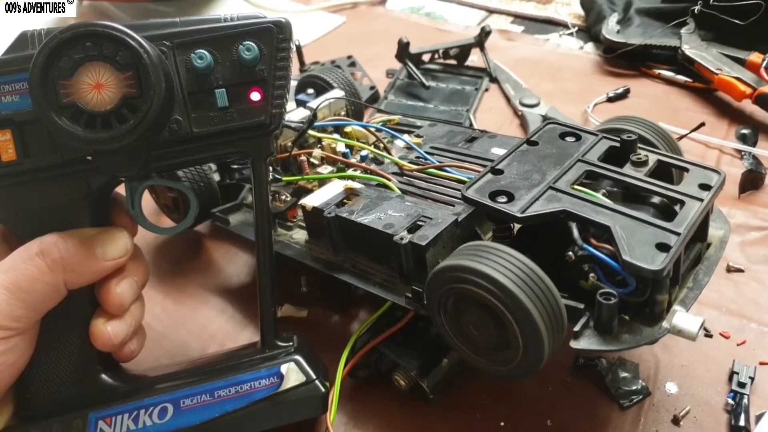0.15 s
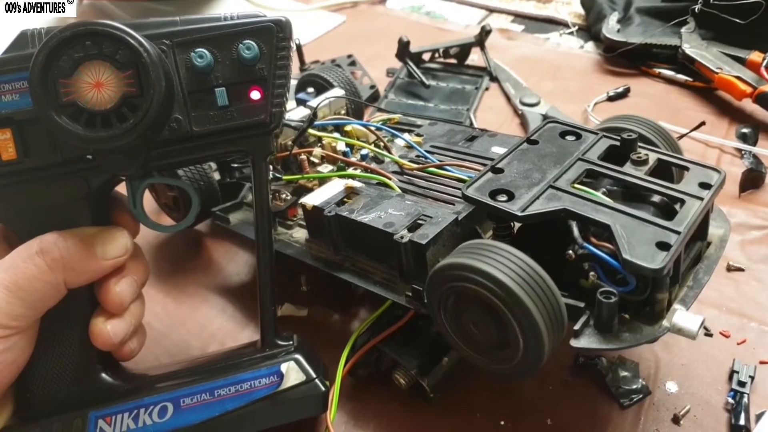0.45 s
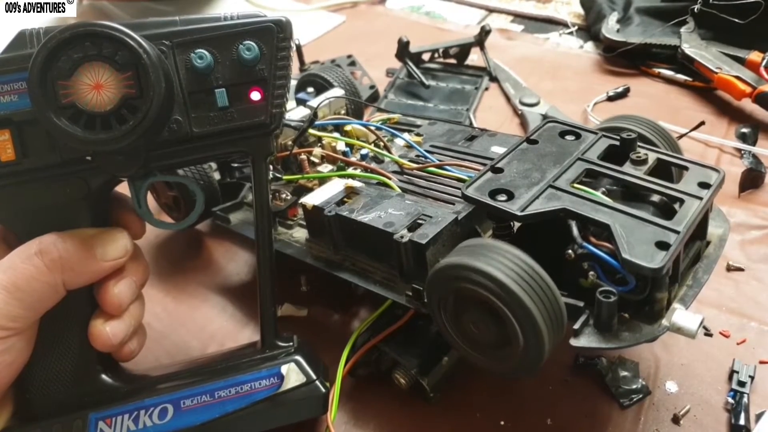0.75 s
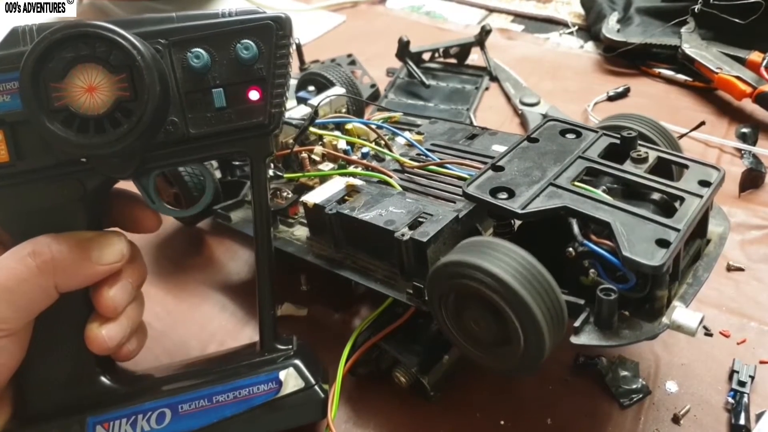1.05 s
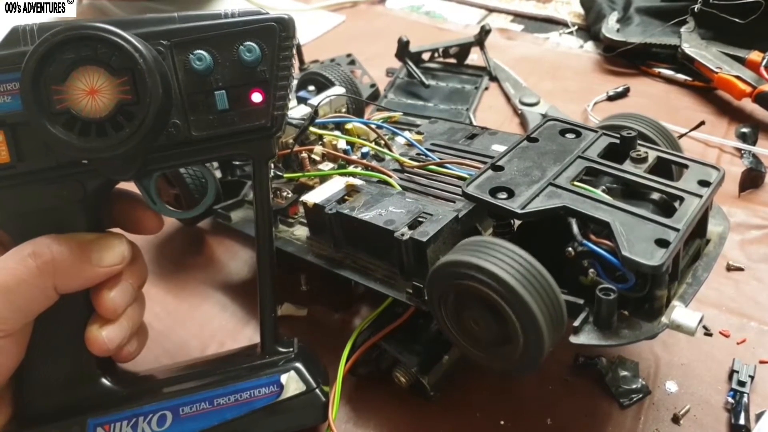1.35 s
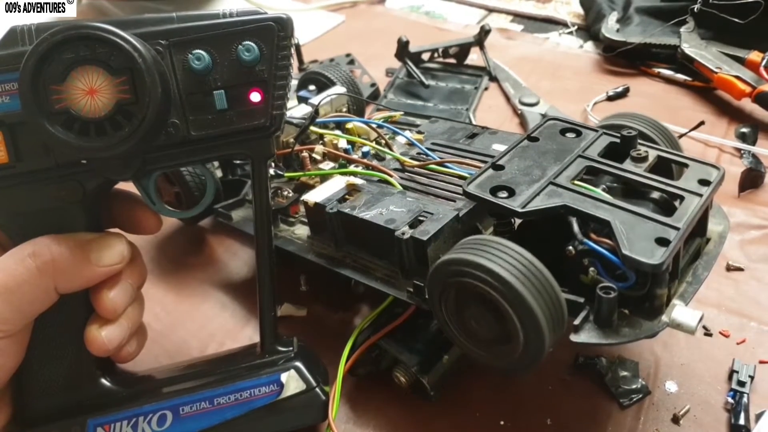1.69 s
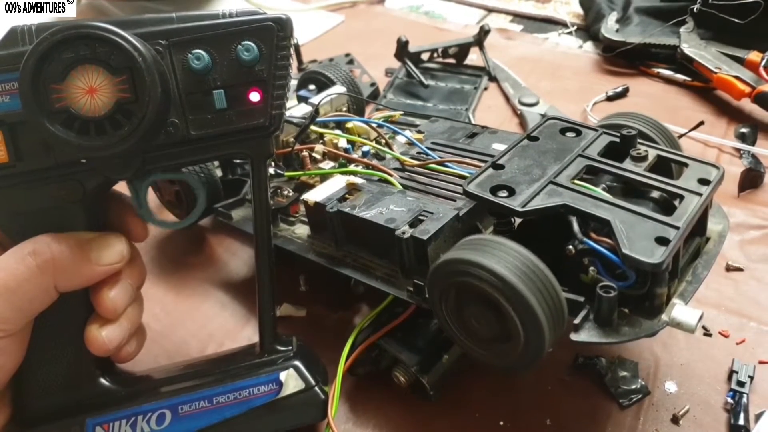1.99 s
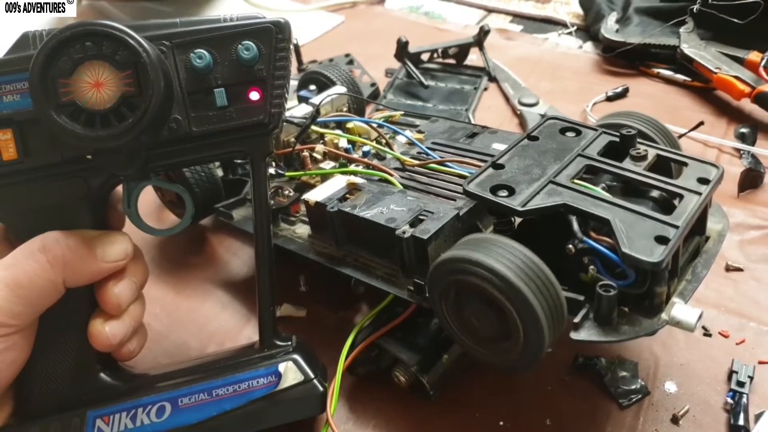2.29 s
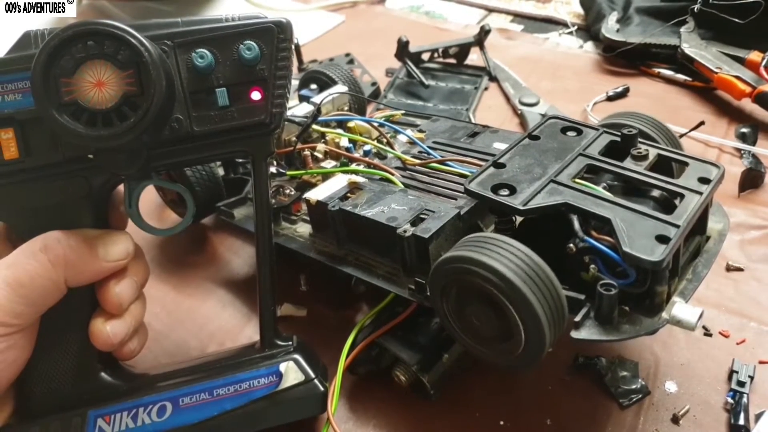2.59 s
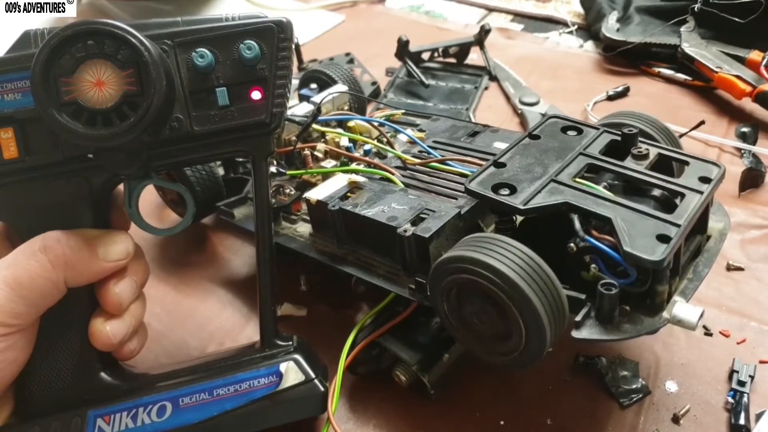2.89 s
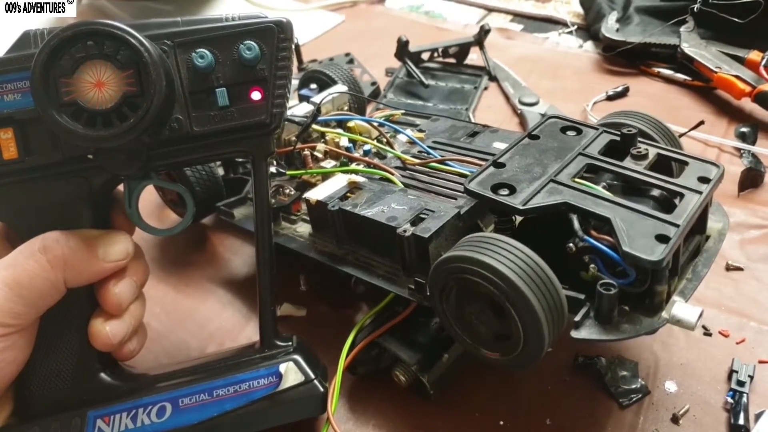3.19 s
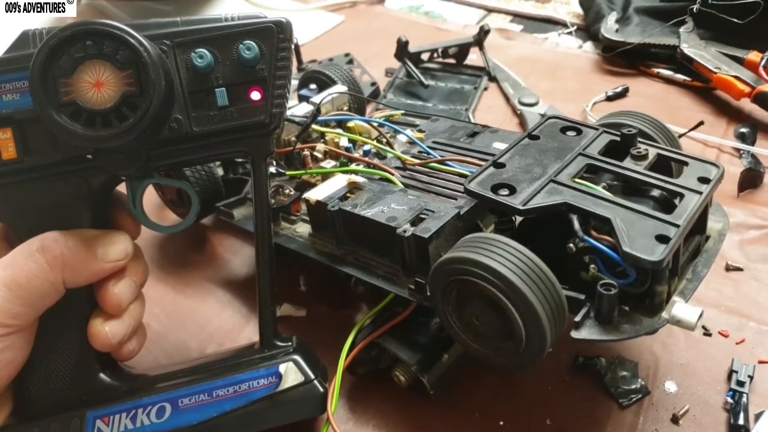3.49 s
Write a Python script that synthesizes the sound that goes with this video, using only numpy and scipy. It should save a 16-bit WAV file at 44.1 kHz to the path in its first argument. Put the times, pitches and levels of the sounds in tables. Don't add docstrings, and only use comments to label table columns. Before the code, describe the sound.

Close up on a workbench, a toy car's motor and gearbox whir, with bright gritty rattle, brush hiss and a thin whine; speed climbs, holds, dies away, then kicks back in with quick knocks.

```python
import sys
import numpy as np
from scipy import signal
from scipy.fft import rfft, irfft, next_fast_len
from scipy.io import wavfile
from scipy.ndimage import uniform_filter1d, map_coordinates

SR = 44100
rng = np.random.default_rng(int(sys.argv[2]) if len(sys.argv) > 2 else 0)


def dump_mix(stems):
    frames = np.atleast_2d(stems).T
    limited = np.clip(frames, -1, 1)
    pcm = np.round(limited * 32767).astype(np.int16)
    wavfile.write(sys.argv[1], SR, pcm)


def field_ratio(decibels):
    return 10 ** (np.asarray(decibels, dtype=float) / 20)


N = 160965
FULL_HZ = 385

# time in seconds, speed in turns per second (Hz).
SHAFT = [(0, 256), (.3, 270), (.6, 303), (.8, 350), (.95, 371), (1.05, 378), (1.4, 385), (2.15, 391),
         (2.21, 381), (2.35, 316), (2.6, 240), (3.0, 130), (3.45, 20), (3.5, 45), (3.65, 150)]
# time in seconds, rattle level in dB.
EFFORT = [(0.0, -17.5), (0.17, -17), (0.29, -18), (0.92, -16.5), (2.1, -18), (2.22, -16), (2.51, -20.5),
          (2.89, -25), (2.93, -28.5), (2.955, -26), (3.0, -32.5), (3.03, -28.5), (3.29, -35.5),
          (3.42, -40.5), (3.47, -45.5), (3.5, -40), (3.56, -27.5), (3.65, -22)]
# frequency in Hz, level in dB.
BODY = [(120, -78), (300, -28.5), (580, -33), (1000, -15), (2000, -5), (3300, -1), (6200, -10), (8500, -25)]
# frequency in Hz, level in dB.
BRUSH = [(5000, -37.5), (7500, -13), (9000, -13), (12500, -11.5), (15000, -13), (15600, -11)]


def unit(x):
    return x / np.sqrt(np.mean(x ** 2) + 1e-20)


def along(points, hz):
    f, value = np.transpose(points)
    return np.interp(np.log(hz + 1), np.log(f + 1), value)


def curve(rows):
    return np.interp(np.arange(N) / SR, *np.transpose(rows))


def wobble(rate):
    knots = rng.standard_normal(int(N * rate / SR) + 4)
    return map_coordinates(knots, [np.arange(N) * rate / SR])


def filtered(x, response):
    m = next_fast_len(N + SR // 2)
    return irfft(rfft(x, m) * response(np.fft.rfftfreq(m, 1 / SR)), m)[..., :N]


def rings(f):
    # frequency in Hz, width in Hz, strength in dB.
    resonances = [(461, 15, 10), (863, 150, 6), (1054.5, 14, 14.5), (1183, 26, 8), (1315, 30, 8.5),
                  (1892, 13.8, 10.5), (2220, 85, 2), (2414, 19, 6), (3310, 15, 4.5), (3483, 25, 4),
                  (6770, 77, 9), (4470, 162, 7), (5416, 450, 4.5), (7380, 150, 7.5)]
    power = 1
    for centre, width, db in resonances:
        peak = (f * width) ** 2 / ((centre ** 2 - f * f) ** 2 + (f * width) ** 2)
        power = power + field_ratio(2 * (0.8 + db)) * peak
    return np.sqrt(power)


def chassis(f):
    return field_ratio(along(BODY, f)) * rings(f)


def patchy(x):
    z = signal.stft(x, nperseg=256)[2]
    field = rng.standard_normal(z.shape[1:])
    field = uniform_filter1d(field, size=3, axis=0)
    field = uniform_filter1d(field, size=16, axis=1)
    patch_db = 1.47 * unit(field)
    return signal.istft(z * field_ratio(patch_db), nperseg=256)[1][:, :N]


def knocks(shaft_hz, parts):
    idle_knocks_hz, knocks_per_turn = 83.6, 2.2
    t60_s, rise_s = 0.0097, 0.002
    chance = (idle_knocks_hz + knocks_per_turn * shaft_hz) / SR
    strength_db = 5 * np.clip(rng.standard_normal((parts, N)), -2, 2)
    hits = (rng.random((parts, N)) < chance) * field_ratio(strength_db)
    hit_power = hits ** 2 + .5 * np.roll(hits, 1, 0) ** 2

    t = np.arange(SR // 20) / SR
    decay = field_ratio(-120 * t / t60_s) * (1 - np.exp(-t / rise_s))
    power = np.abs(signal.fftconvolve(hit_power, decay[None], axes=1)[:, :N])
    power = power / uniform_filter1d(power.mean(0) + 1e-9, size=SR // 4)
    slide_db = -7.5 + 3.5 * np.log2(shaft_hz / FULL_HZ)
    power = power + field_ratio(2 * slide_db)

    wheel_hz = 0.083 * shaft_hz
    wheel = np.sin(2 * np.pi * np.cumsum(wheel_hz) / SR + wobble(5.37))
    swell = field_ratio(1.29 * wheel + 0.2 * (wobble(45) + wobble(45.11)))
    ticks_hz, tick_db = 75.7, 17.5
    ticks = field_ratio(tick_db) * (rng.random((parts, N)) < ticks_hz / SR) * rng.standard_normal((parts, N))
    rattle = np.sqrt(power) * swell * rng.standard_normal((parts, N))
    return unit(patchy(rattle + ticks))


def gears():
    effort_db = curve(EFFORT)
    drive = knocks(curve(SHAFT), parts=3)
    top_db = effort_db.max()
    below_db = effort_db - top_db
    can_hz, can_width_hz = 3930, 440

    def can(f):
        return (1j * f * can_width_hz / (can_hz ** 2 - f * f + 1j * f * can_width_hz)) ** 2

    def brush(f):
        return field_ratio(along(BRUSH, f))

    def sounding(level_db, response):
        full = np.sqrt(np.mean(filtered(drive, response) ** 2))
        return filtered(drive * field_ratio(level_db), response) / full

    ring_db = top_db - 14 + .62 * below_db + 2.5 * wobble(6.15)
    hiss_db = top_db - 11.5 + 1.91 * below_db
    return sounding(effort_db, chassis) + sounding(ring_db, can) + sounding(hiss_db, brush)


def bench(x):
    # frequency in Hz, time to fall by 60 dB in seconds.
    fade_times = [(300, 0.14), (3000, 0.063), (12000, 0.068)]
    far_lags = np.array([4, 17, 31])
    hz, t, z = signal.stft(rng.standard_normal((len(x), 2, SR // 5)), SR, nperseg=128)
    fade = field_ratio(-60 * t / along(fade_times, hz)[:, None])
    tail = signal.istft(z * fade, SR, nperseg=128)[1]
    path = field_ratio(6.5) * tail / np.linalg.norm(tail, axis=-1, keepdims=True)
    path[:, 0, 0] += 1
    path[np.arange(len(x)), 1, far_lags] += 1
    heard = signal.fftconvolve(x[:, None], path, axes=2)[..., :N].sum(0)
    power = (np.abs(rfft(path.sum(1), SR)) ** 2).sum(0) / 2
    colour = uniform_filter1d(power, size=60)
    return filtered(heard, lambda f: np.interp(f, np.arange(len(colour)), colour) ** -.5)


def whine():
    # multiple of the shaft speed, level in dB at full speed, growth in dB per octave of speed.
    orders = [(1, -48, 24), (2, -51, 60), (3, -49, 0), (4, -48, 0), (5, -46, -2), (6, -43, -4),
              (7, -50, -2)]
    # middle in seconds, multiple of the shaft speed, length in seconds, boost in dB.
    locks = [(.1, 5, .06, 5), (.25, 5, .07, 11), (.9, 7, .12, 21), (.97, 5, .04, 11), (1.13, 5, .09, 18),
             (1.26, 5, .06, 14), (1.1, 6, .05, 11), (1.25, 6, .08, 10), (1.7, 5, .1, 9), (2.08, 6, .08, 11),
             (2.2, 5, .06, 18), (2.21, 6, .07, 13)]
    cut_s, fade_db_per_s = 2.27, 123
    seconds = np.arange(N) / SR
    shaft_hz = uniform_filter1d(curve(SHAFT), size=SR // 20) * (1 + .003 * wobble(24.47))
    turn = 2 * np.pi * np.cumsum(shaft_hz) / SR
    octaves = np.log2(shaft_hz / FULL_HZ)
    power_db = -fade_db_per_s * np.clip(seconds - cut_s, 0, None)
    grid = np.arange(4000)
    gain = np.abs(chassis(grid))

    total = np.zeros((2, N))
    for k, db, grow_db in orders:
        lock_db = np.zeros(N)
        for middle_s, multiple, long_s, boost_db in locks:
            if multiple == k:
                lock_db += boost_db * np.exp(-(2 * (seconds - middle_s) / long_s) ** 4)
        if k > 2:
            flare = (np.interp(k * shaft_hz, grid, gain) / np.interp(k * FULL_HZ, grid, gain)) ** .6
        else:
            flare = field_ratio(120 * np.minimum(np.log2(k * shaft_hz / 305), 0))
        flutter_db = (.7 + 0.52 * k) * wobble(12.08) * np.exp(-lock_db / 4)
        dropout_db = 30 * np.minimum(octaves, 0) * np.abs(wobble(13.55)) * (k <= 4)
        level_db = db + grow_db * octaves + power_db + lock_db + flutter_db + dropout_db
        apart = np.array([[0], [np.pi / 2 * (k > 2)]])
        total += np.sqrt(2) * field_ratio(level_db) * flare * np.sin(k * turn + apart)
    return total


def clacks():
    # start in seconds, peak level in dB.
    blows = [(1.296, -13.5), (1.354, -11), (1.478, -10.5), (1.512, -12), (2.42, -21), (2.611, -14),
             (2.819, -16), (2.831, -15.5), (2.873, -22), (2.889, -17), (2.944, -15), (2.954, -17),
             (3.01, -20), (3.026, -19), (3.071, -22), (3.3, -36), (3.481, -36), (3.486, -33), (3.499, -28),
             (3.509, -18.5), (3.522, -24), (3.534, -18), (3.551, -18), (3.568, -17), (3.592, -14),
             (3.6, -13), (3.636, -11), (3.642, -11)]
    t60_s, rise_s = .021, .0015
    thud_hz, thud_width_hz, thud_db = 580, 480, -15
    t = np.arange(SR // 25) / SR
    shape = field_ratio(-60 * t / t60_s) * (1 - np.exp(-t / rise_s))
    hits = np.zeros((2, N + len(t)))
    for s, db in blows:
        start = round(s * SR)
        hits[:, start:start + len(t)] += field_ratio(db - 2) * shape * rng.standard_normal((2, len(t)))

    def bright(f):
        return field_ratio(along(BODY, f)) + field_ratio(along(BRUSH, f) - 10.5)

    def thud(f):
        return np.abs(f * thud_width_hz / (thud_hz ** 2 - f * f + 1j * f * thud_width_hz)) ** 2

    bright_rms = np.sqrt(np.mean(bright(np.fft.rfftfreq(SR, 1 / SR)) ** 2))
    return filtered(hits[:, :N], lambda f: bright(f) / bright_rms + 2 * field_ratio(thud_db) * thud(f))


def floor():
    # frequency in Hz, level in dB.
    room_colour = [(20, -24), (60, -20), (230, -15), (450, 14.5), (2000, -13.5), (4000, -52), (8000, -40),
                   (15500, -33)]
    # frequency in Hz, level in dB.
    rumble_colour = [(8, -60), (15, -40), (30, -7), (90, -4.5), (125, 3.5), (160, -2.5), (230, -9.5),
                     (330, -31)]

    def noise(points):
        white = rng.standard_normal((2, N))
        return unit(filtered(white, lambda f: field_ratio(along(points, f))))

    effort_db = curve(EFFORT)
    below_db = effort_db - effort_db.max()
    room = field_ratio(-53 + .33 * below_db) * noise(room_colour)
    rumble = field_ratio(-59.5 + 0.67 * below_db) * noise(rumble_colour)
    return room + rumble


def scene():
    return bench(gears()) + whine() + clacks() + floor()


def roll_off(x):
    return signal.sosfilt(signal.butter(12, 15700, fs=SR, output="sos"), x)


def record(dry):
    # frequency in Hz, level in dB.
    side_over_mid = [(60, -16), (130, -33), (290, -9.5), (640, -12.5), (1410, -3.5), (3100, -1.5),
                     (6820, -0.5), (15000, -0.5)]
    top_hz = 15350

    def mid_gain(f):
        return (f < top_hz) / np.sqrt(1 + field_ratio(along(side_over_mid, f)) ** 2)

    def side_gain(f):
        return mid_gain(f) * field_ratio(along(side_over_mid, f))

    mid = filtered(dry[0] + dry[1], mid_gain)
    side = filtered(dry[0] - dry[1], side_gain)
    return roll_off(np.array([mid + side, mid - side]) / np.sqrt(2))


dry = scene()
out = record(dry)
dump_mix(out)
```